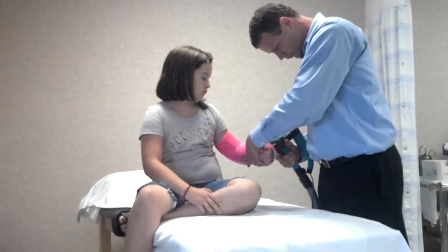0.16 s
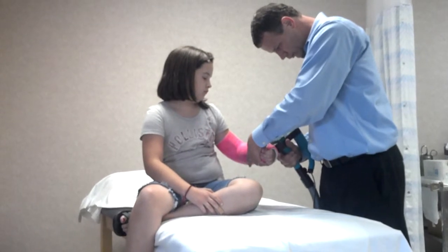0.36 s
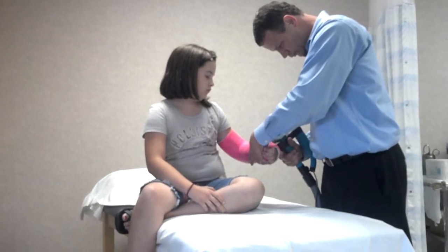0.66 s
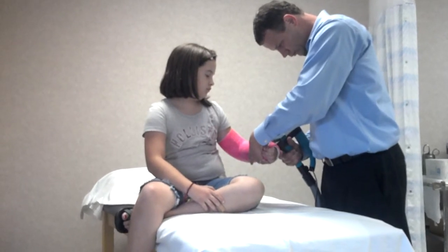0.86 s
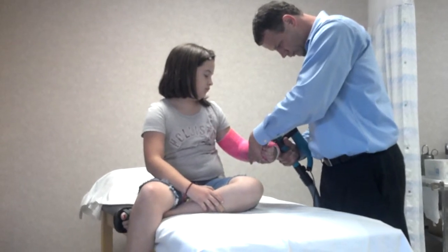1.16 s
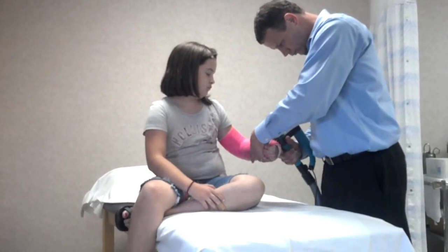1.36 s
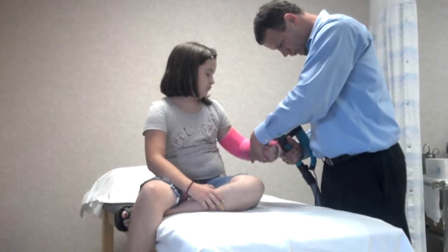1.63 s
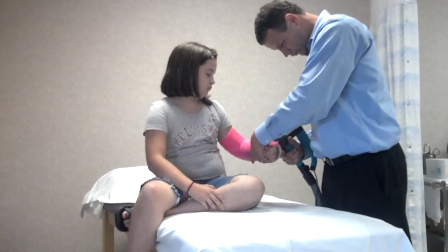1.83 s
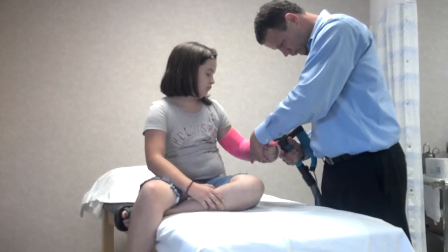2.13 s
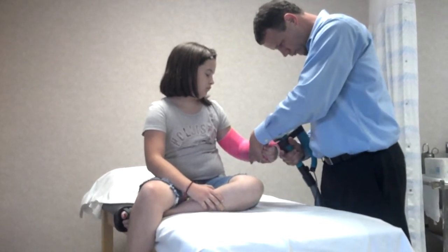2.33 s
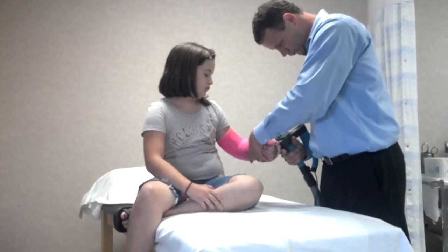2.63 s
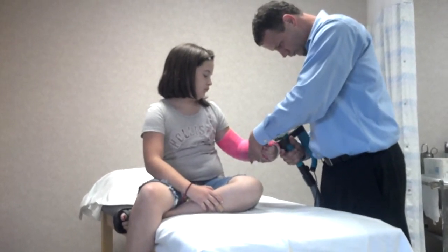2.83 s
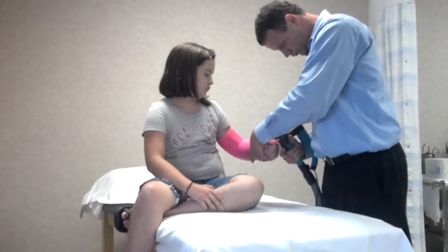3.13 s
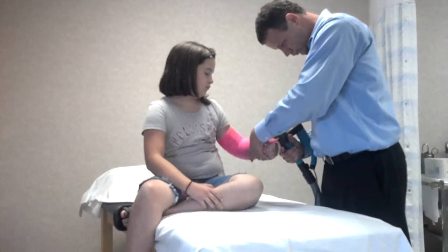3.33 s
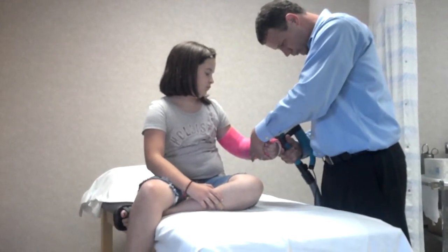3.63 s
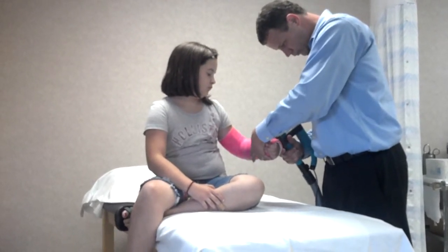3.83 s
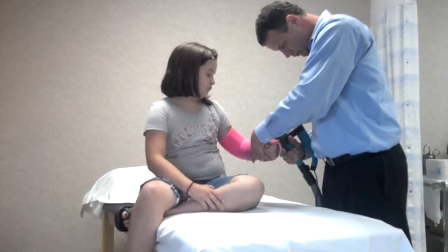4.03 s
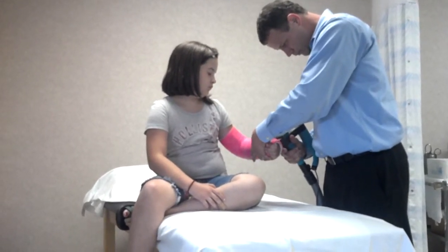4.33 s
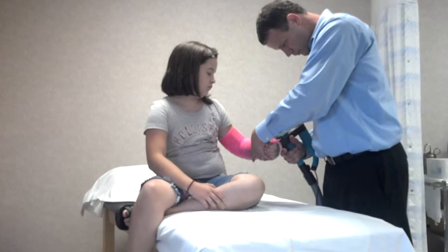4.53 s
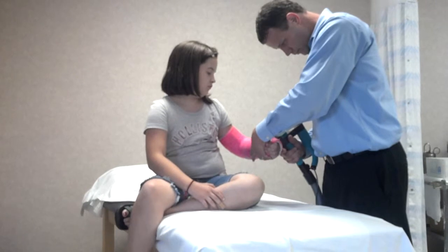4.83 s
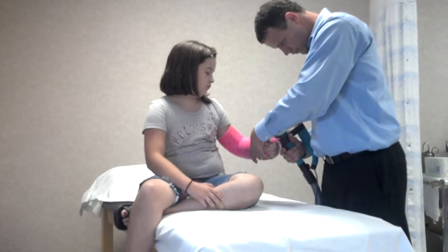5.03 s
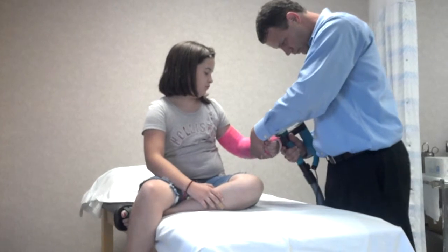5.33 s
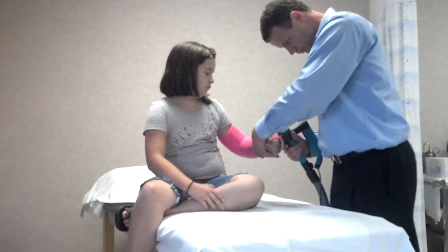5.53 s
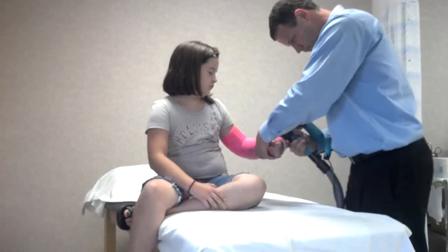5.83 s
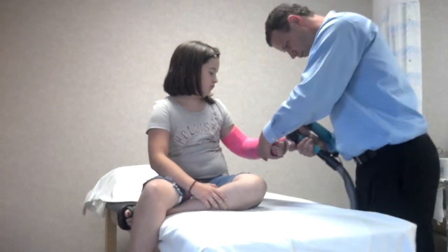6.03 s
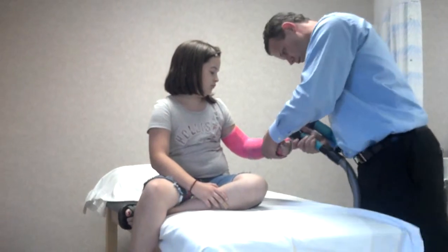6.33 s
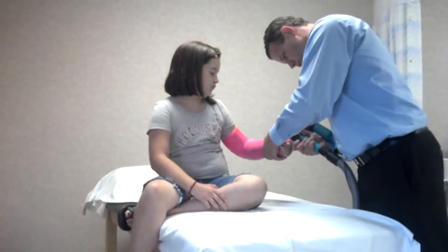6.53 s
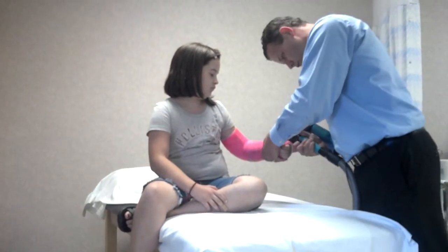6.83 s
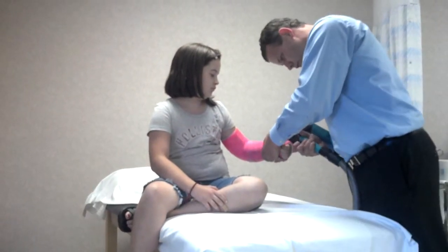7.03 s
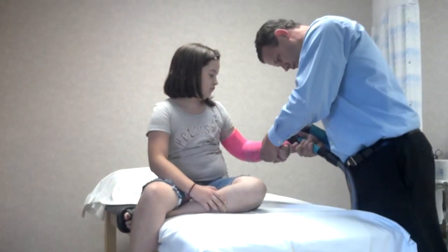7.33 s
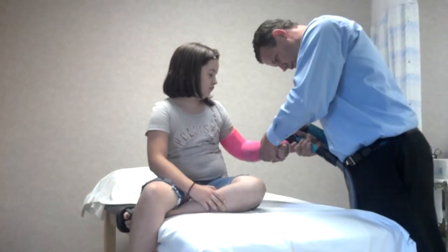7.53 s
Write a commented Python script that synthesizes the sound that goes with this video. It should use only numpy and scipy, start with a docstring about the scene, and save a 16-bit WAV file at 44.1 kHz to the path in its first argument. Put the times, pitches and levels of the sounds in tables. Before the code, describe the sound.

Raspy electric cast saw grinding a rigid shell, its buzz thickening and thinning with pressure, fan whir and rushing air behind, a few dull knocks.

```python
"""Oscillating cast saw with dust extractor

A saw cuts a hard arm cast in a small clinic room: each stroke raps the shell and scrapes grit from it as noise
bursts, setting cast and blade ringing. Pushes slow the motor and boost the cast; running freer, its gears buzz.
The extractor is a stack of fan overtones over filtered noise. Rings and noise bursts make knocks as the shell
gives; brief faint tones come late. A small microphone with a widened stereo image hears it all."""
import sys
import numpy as np
from scipy import signal
from scipy.fft import rfft, irfft, next_fast_len
from scipy.io import wavfile
from scipy.ndimage import uniform_filter1d

SR = 44100
rng = np.random.default_rng(int(sys.argv[2]) if len(sys.argv) > 2 else 0)


def generate_wav(sig):
    """Save sig (samples, or channels by samples) to the path in sys.argv[1] as 16-bit PCM at SR."""
    pcm = np.round(np.clip(np.atleast_2d(sig).T, -1, 1) * 32767).astype(np.int16)
    wavfile.write(sys.argv[1], SR, pcm)


N = 338247

# colour of the rushing air: f/Hz, level/dB per Hz
AIR_COLOUR = [(25, -94), (65, -79), (100, -76.5), (150, -71), (270, -68), (420, -73), (850, -72),
              (1050, -70), (2000, -76.5), (3300, -78.5), (6000, -88), (8000, -84), (12000, -92.5),
              (16000, -91.5)]


def undb(db):
    """Decibels to gain."""
    return 10 ** (np.asarray(db) / 20)


def curve(table):
    """A (time, value) table joined by straight lines."""
    s, value = np.transpose(table)
    return np.interp(np.arange(N) / SR, s, value)


def bins():
    """Frequencies of the padded spectrum that all frequency-response filters share."""
    return np.fft.rfftfreq(2 * next_fast_len(N // 2 + SR // 2), 1 / SR)


def filtered(x, response):
    """Apply a frequency response."""
    size = 2 * (len(response) - 1)
    return irfft(rfft(x, size) * response, size)[..., :N]


def contour(points):
    """(Hz, value) points joined on a log-frequency axis."""
    hz, value = np.transpose(points)
    return np.interp(np.log(bins() + 1), np.log(hz), value)


def resonances(modes):
    """Response of (Hz, half-power width, dB) modes with steep skirts; their powers add."""
    f = bins() + 1
    power = 0
    for hz, width, db in modes:
        detune = (f - hz * hz / f) / (1.55 * width)
        power = power + undb(2 * db) / (1 + detune ** 2) ** 2
    return np.sqrt(power)


def flat(x):
    """Scale a broadband drive to unit power per Hz."""
    return x * np.sqrt(SR / 2) / np.std(x)


def noise():
    """White noise of unit power per Hz."""
    return flat(rng.standard_normal(N))


def walk(rate):
    """Random levels held 1 / rate s and slewed twice; spread near 1."""
    k = max(int(SR / rate), 1)
    steps = np.repeat(rng.standard_normal(N // k + 1), k)
    return 1.3 * uniform_filter1d(uniform_filter1d(steps, k), k)[:N]


def decay(t, t60):
    """Exponential decay that falls 60 dB in t60 seconds."""
    return np.exp(-np.log(1000) * t / t60)


def swell(s, length):
    """A rounded rise and fall that starts at s."""
    part = np.clip((np.arange(N) / SR - s) / length, 0, 1)
    return np.sqrt(np.abs(np.sin(np.pi * part)))


def room(x, t60, wet_db, ripple=0.62):
    """Direct sound and a dense, short tail; ripple 0-1 is how much the reflections colour it."""
    t = np.arange(SR // 2) / SR
    tail = rng.standard_normal(len(t)) * decay(t, t60) * (t > .002)
    reflections = rfft(tail / np.linalg.norm(tail), 2 * len(bins()) - 2)
    wet = undb(wet_db)
    paths = (1 + wet * reflections) / np.hypot(1, wet)
    flattening = (np.abs(paths) + 0.0083) ** (ripple - 1)
    return filtered(x, paths * flattening)


def pushes():
    """Hz by which the motor sags as the hand leans on the saw and eases off."""
    # pushes: hardest/s, rise/s, release/s, motor sag/Hz
    leans = [(0.481, 0.36, 0.47, 3.68), (1.058, .1, 0.13, 4.32), (2.191, 0.068, .25, 3.13),
             (2.42, .22, .15, 4.9), (3.619, 0.37, 0.19, 4.88), (4.73, .32, .21, 4.06), (5.5, .25, .22, 2.6),
             (5.74, 0.16, 0.068, 3.97), (7.42, 0.36, 0.53, 3.8)]
    t = np.arange(N) / SR
    return sum(np.interp(t, [s - rise, s, s + release], [0, sag_hz, 0]) for s, rise, release, sag_hz in leans)


def bites():
    """Extra scraping and blade ring in dB as the teeth catch: each bite grips quickly, holds and lets go."""
    # spurts of torn grit: t/s, length after the attack/s, extra scraping before its limit/dB, extra ring/dB
    catches = [(0, 0.19, 6.5, 5), (0.838, 0.07, 7.5, 1), (1.012, 0.16, 8.5, 7), (2.146, 0.078, 6, 5),
               (2.357, 0.16, 8, -1), (3.147, 0.14, 6, 5), (3.565, 0.22, 9, 11), (4.651, .22, 4.5, -1),
               (4.981, 0.2, 4, 0), (5.65, 0.11, 8.5, 5), (6.607, 0.35, 6, 5), (7.351, 0.23, 2.5, 5.5)]
    attack_s, hold_share = 0.0052, 0.44  # the hold is a share of the bite's length
    t = np.arange(N) / SR
    total = np.zeros((2, N))
    for s, length, scrape_db, ring_db in catches:
        corners = [-attack_s, 0, hold_share * length, length]
        grip = np.interp(t - s - attack_s, corners, [0, 1, 1, 0])
        total += np.outer([scrape_db, ring_db], grip)
    return total


def cutting():
    """Levels in dB of rapping, scraping and blade ring: all grow with contact; bites add grit up to a limit."""
    # how firmly the blade lies on the cast: t/s, contact/dB
    firmness = [(0.0, -10.5), (0.6, -8.5), (1.1, -3), (1.2, -3.5), (1.3, -1), (1.55, -.5), (1.93, -2.5),
                (2.08, -8), (2.2, -3.5), (2.55, -7), (2.88, -17.5), (3.1, -24), (3.2, -13), (3.45, -8),
                (3.62, -3), (4.0, -4.5), (4.45, -1.5), (4.8, -1), (5.1, -8), (5.25, 0), (5.38, -2.5),
                (5.74, -1.5), (5.86, -12), (6.5, -10.5), (6.7, -10.5), (7.1, -10.5), (7.42, -6), (7.67, -6)]
    # level at 0 dB contact (dB) and growth (dB per dB of contact)
    rap_firm_db, rap_growth = 2, 1.25
    scrape_firm_db, scrape_growth = 0.5, 0.65
    ring_firm_db, ring_growth = -0.5, 1.31
    rap_loss_per_bite = 0.43  # dB per dB of bite: the even rapping falters
    full_bite_db = 6.5  # soft ceiling: the teeth can tear only so much on one swing
    contact_db = curve(firmness)
    bite_db, bite_ring_db = bites()
    rap_db = rap_firm_db + rap_growth * contact_db - rap_loss_per_bite * bite_db
    tear_db = scrape_firm_db + scrape_growth * contact_db + bite_db
    scrape_db = tear_db - 10 * np.log10(1 + undb(2 * (tear_db - full_bite_db)))
    ring_db = ring_firm_db + ring_growth * contact_db + bite_ring_db + walk(8.2)  # 1 dB waver
    return rap_db, scrape_db, ring_db


def raps(turns, hz, jitter, scatter_db):
    """One sharp tap per turn, each early or late by a share of a stroke and of its own force."""
    stroke = np.round(turns).astype(int)
    late, force = rng.standard_normal((N // 100, 2))[stroke].T
    samples = (turns - stroke - jitter * late) * SR / hz
    return np.sinc(samples) * np.exp(-(samples / 10) ** 2) * undb(scatter_db * force)


def tearing(turns, hz):
    """Fibres tear in bursts on each swing; retracing a groove repeats part of the rasp until a fresh bite."""
    groove_kept = .45  # share of the rasp that one stroke passes to the next
    groove_loss_per_bite = .6  # dB per dB of bite
    kept = np.clip(groove_kept * undb(-groove_loss_per_bite * bites()[0]), 0, .9)
    groove, now = noise(), np.arange(N)
    rasp = np.zeros(N)
    for k in range(5):
        earlier = np.round(now - k * SR / hz).astype(int)
        rasp += kept ** k * groove[earlier]
    rasp *= np.sqrt(1 - kept ** 2)  # hold the level as more is kept
    swing = 2 * np.pi * turns
    burst_db = 5.5 * np.cos(swing) + 4.3 * np.cos(2 * swing)  # loudest at the forward rap
    return flat(rasp * undb(burst_db + 1.6 * walk(150)))


def rattle(hz):
    """Level of the gear buzz in dB: gears rattle when the motor runs free; load takes up their play."""
    free_hz, free_db, loaded_db, hush_db_per_hz = 179.08, 0.1, -12, 5
    db = free_db - hush_db_per_hz * np.maximum(free_hz - hz, 0)
    return np.maximum(db, loaded_db) + walk(18)  # the play comes and goes by about 1 dB


def slot(grit):
    """The blade sinks into a fresh place; scraping rings a resonance of the cut that climbs and settles."""
    # singing slots: t/s, length/s, level/dB
    cuts = [(0, 1.05, -48), (2.449, 0.41, -51), (6.6, 0.89, -41)]
    shallow_hz, deep_hz, sink_s = 3710, 4230, 0.28
    t, out = np.arange(N) / SR, np.zeros(N)
    lowpass = signal.butter(2, 160, fs=SR, output="sos")  # half the resonance's width, in Hz
    for s, length, db in cuts:
        hz = deep_hz + (shallow_hz - deep_hz) * np.exp(-np.maximum(t - s, 0) / sink_s)
        carrier = np.exp(2j * np.pi * np.cumsum(hz) / SR)
        narrow = signal.sosfilt(lowpass, grit / carrier)  # grit around the moving pitch
        sing = (narrow * carrier).real
        out += sing / np.std(sing) * undb(db) * swell(s, length)
    return out


def shifting(x):
    """Hands and blade keep moving, so the overtones trade strength while their sum holds."""
    near, far = 0.47 * walk(8), 0.43 * walk(17)
    echoes = near * room(x, t60=0.041, wet_db=34) + far * room(x, t60=0.12, wet_db=34)
    return (x + echoes) / np.sqrt(1 + near ** 2 + far ** 2)


def singing(swing):
    """A loosened flap of the cast locks on to an overtone of the stroke and wavers."""
    # spells of singing: t/s, length/s, multiple of the stroke rate, level before waver/dB RMS
    spells = [(0.247, 0.65, 7, -44.5), (1.35, 0.73, 11, -38.5), (1.269, 0.57, 20, -41),
              (2.22, 0.16, 13, -37), (3.385, 0.26, 7, -39.5), (3.85, .8, 11, -41), (4.0, 0.75, 14, -43),
              (4.3, 0.49, 13, -40), (5.22, 0.55, 14, -35), (5.2, 0.48, 11, -39), (5.302, .35, 13, -37),
              (5.33, .28, 15, -32), (5.321, 0.32, 16, -33), (5.63, 0.13, 9, -36), (5.631, 0.17, 21, -34),
              (5.854, 0.895, 7, -45.5), (6.08, .22, 18, -39), (6.2, .3, 20, -44), (5.9, 1.0, 13, -43.5),
              (6.291, .36, 19, -44.5), (6.784, 0.2, 9, -34), (7.08, 0.76, 10, -35.5),
              (7.278, 0.24, 12, -37), (7.331, 0.19, 13, -41)]
    waver_db, waver_rad = 3, .8
    out = np.zeros(N)
    for s, length, k, db in spells:
        level = undb(db + waver_db * walk(30)) * swell(s, length)
        out += level * np.sin(k * swing + waver_rad * walk(45))
    return np.sqrt(2) * out


def saw():
    """The blade raps the cast on each swing and back, scraping most at the forward rap; shell and steel ring."""
    # motor speed before the pushes slow it: t/s, stroke rate/Hz
    motor_speed = [(0, 176.2), (.55, 175.5), (.9, 175.7), (1.33, 172), (1.55, 174.8), (1.9, 173.6),
                   (2.05, 176.7), (2.6, 176), (3.25, 177.7), (3.7, 175.2), (4.4, 173.8), (5.02, 177),
                   (5.3, 175.4), (5.45, 175.5), (5.74, 173.3), (5.87, 178.9), (6.88, 178.7), (6.99, 174.5),
                   (7.67, 173.8)]
    # colours of the blows, the scraping and the gears: f/Hz, response/dB
    rap_colour = [(150, -94), (500, -69), (1000, -73), (1400, -69.5), (1900, -68.5), (2400, -81),
                  (2750, -78), (3100, -66.5), (3500, -66.5), (4600, -69), (5700, -72.5), (6900, -73),
                  (8000, -76.5), (11000, -86.5), (16000, -99)]
    scrape_colour = [(300, -92), (1200, -73.5), (2000, -68.5), (2800, -67.5), (3700, -67), (4600, -67),
                     (5700, -68.5), (7000, -73.5), (8000, -78.5), (10500, -81.5), (13000, -104),
                     (14200, -81.5), (16000, -102)]
    gear_colour = [(170, -76), (900, -69), (1250, -67), (1600, -72), (2300, -70), (2700, -79),
                   (3330, -63.5), (3700, -80.5), (4200, -86), (5200, -76), (6500, -77), (8000, -104),
                   (14000, -90), (16000, -99)]
    # modes of the hollow cast, then of the steel blade: f/Hz, width/Hz, response/dB
    shell_modes = [(1740, 30, -62.5), (1928, 59, -63.5), (2024, 105, -60.5), (2120, 110, -66),
                   (2427, 126, -59), (3700, 290, -83), (3950, 110, -81)]
    blade_modes = [(5095, 83, -56), (5110, 94, -54.5), (5220, 140, -60), (12260, 180, -79.5),
                   (13800, 600, -90)]
    shell_db, shell_db_per_hz = -3.5, 2  # the cast booms more as a push sags the motor
    hand_waver_db = .7

    sag_hz = pushes()
    hz = (curve(motor_speed) - sag_hz) * (1 + .0009 * walk(35))
    turns = 1 + np.cumsum(hz) / SR
    rap_db, scrape_db, ring_db = cutting()
    # a seated blade strikes very evenly; the return blow is weaker and looser
    forward = raps(turns, hz, jitter=.0011, scatter_db=1.1)
    back = raps(turns + .47, hz, jitter=0.002, scatter_db=3)
    grit = tearing(turns, hz)
    rapping = flat(forward + 0.39 * back) * undb(rap_db + hand_waver_db * walk(14))
    scraping = grit * undb(scrape_db + hand_waver_db * walk(22.02))
    contact = filtered(rapping, undb(contour(rap_colour))) + filtered(scraping, undb(contour(scrape_colour)))
    boom = undb(shell_db + shell_db_per_hz * sag_hz)
    shell = filtered((rapping + .3 * scraping) * boom, resonances(shell_modes))
    # even out the drive so that ring_db mainly sets the blade's level
    drive = (rapping + .45 * scraping) / np.hypot(undb(rap_db), 0.39 * undb(scrape_db))
    blade = filtered(drive * undb(ring_db), resonances(blade_modes))
    gear_taps = flat(raps(turns + 0.2385, hz, jitter=0.00055, scatter_db=0.0))
    gear = filtered(gear_taps * undb(rattle(hz)), undb(contour(gear_colour)))
    sound = contact + shell + blade + slot(grit) + gear
    return room(shifting(sound), t60=.22, wet_db=2, ripple=0.18) + singing(2 * np.pi * turns)


def extractor():
    """Fan blades sound a steady note; the air they draw rushes through canister and hose."""
    # overtones of the fan: multiple, level/dB
    fan_orders = [(1, -0.5), (2, -23), (3, -19.5), (4, -26.5), (12, -28.5), (22, -54)]
    # fan hum, before a 6 dB lift: t/s, level/dB
    hum_level = [(0, -30), (0.45, -28.5), (0.87, -26), (1.5, -30), (2.17, -28.5), (2.4, -35.5), (2.9, -34),
                 (3.55, -27), (3.66, -32), (4.1, -29), (4.6, -32), (5.3, -29.5), (5.78, -33), (6.1, -30.5),
                 (6.35, -30.5), (7.2, -26.5), (7.67, -28.5)]
    # rushing air, used as a scaled swing about its mean: t/s, level/dB
    air_level = [(0, -36.5), (0.9, -33), (1.3, -36), (2.5, -35.5), (2.85, -36), (3.5, -31), (3.72, -39),
                 (5.4, -35), (5.85, -38.5), (7.15, -30.5), (7.67, -32)]
    # resonances of canister and hose: f/Hz, width/Hz, level/dB per Hz
    canister = [(121.5, 20, -67), (178.8, 19.3, -54.5), (219.7, 15.6, -58), (335.2, 34.5, -56),
                (478.4, 11.6, -59.5), (535, 17, -62.5), (645, 63, -63), (707, 71, -57), (770, 19, -61),
                (824, 19.5, -59.5), (908, 19, -58)]
    fan_hz = 382.66
    angle = 2 * np.pi * np.cumsum(fan_hz * (1 + 0.000684 * walk(4.08))) / SR
    hum = np.zeros(N)
    for k, db in fan_orders:
        shake_db = .4 if k == 1 else 2.5  # turbulence shakes the overtones more than the fundamental
        hum += undb(db + shake_db * walk(28)) * np.sin(k * angle)
    air = filtered(noise(), np.hypot(undb(contour(AIR_COLOUR)), resonances(canister)))
    air_db = curve(air_level)
    rush_db = 0.67 * (air_db - np.mean(air_db)) + 0.88 * walk(9)
    return hum * undb(curve(hum_level) + 6.0), air * undb(rush_db)


def ring(modes, t):
    """Decaying sines of (Hz, dB, t60) modes, all struck at once."""
    return sum(undb(db) * decay(t, t60) * np.sin(2 * np.pi * hz * t) for hz, db, t60 in modes)


def burst(band_hz, t60, t):
    """A decaying burst of band-passed noise."""
    bandpass = signal.butter(2, band_hz, "bandpass", fs=SR, output="sos")
    return signal.sosfilt(bandpass, rng.standard_normal(len(t)) * decay(t, t60))


def knocks():
    """The shell gives way: a short crack and a low crunch, and the blow rings on in cast and support."""
    # knocks: t/s, level/dB, share of low thud/dB
    blows = [(2.182, -23.5, 1), (2.189, -36, -3), (2.197, -29.5, -0.5), (2.836, -28, -25),
             (2.846, -32, -25)]
    # what rings, high in the shell and low in arm and couch: f/Hz, level/dB, t60/s
    clack_modes = [(830, -7, 0.22), (943, -2, 0.14), (1050, 2, 0.092), (1154, -4, .13), (1280, -10, .13),
                   (1420, -11, .11), (1640, -11, .07)]
    thud_modes = [(135, -9.5, 0.23), (171, -3, .33), (232, -1, 0.3), (318, -3.5, .25), (447, -3, .14),
                  (530, -8, .12)]
    t, out = np.arange(SR // 2) / SR, np.zeros(N)
    for s, db, thud_db in blows:
        crack = undb(11) * burst((750, 2200), .07, t)
        crunch = undb(13.5) * burst((120, 830), 0.33, t)
        high = ring(clack_modes, t) + crack
        low = ring(thud_modes, t) + crunch
        start = int(s * SR)
        out[start:start + len(t)] += undb(db) * (high + undb(thud_db) * low)
    # the cast is too small to radiate below 115 Hz
    highpass = signal.butter(4, 115, "highpass", fs=SR, output="sos")
    return room(signal.sosfilt(highpass, out), t60=0.2, wet_db=-8, ripple=0.42)


def tones():
    """Brief, faint sine tones under the din that glide and waver in pitch as they swell and sag."""
    # tones: t/s, length/s, start f/Hz, end f/Hz, level before the swell/dB RMS
    glides = [(6.492, 0.17, 437.4, 430, -40), (6.637, 0.14, 449, 421.3, -35.5), (7.47, .18, 554, 550, -35)]
    t, out = np.arange(N) / SR, np.zeros(N)
    for s, length, start_hz, end_hz, db in glides:
        part = np.clip((t - s) / length, 0, 1)
        hz = (start_hz + (end_hz - start_hz) * part) * (1 + 0.0047 * walk(50))
        level = undb(db) * np.sqrt(2) * np.sin(np.pi * part)
        out += level * np.sin(2 * np.pi * np.cumsum(hz) / SR)
    return out


def scene():
    """All reaches one spot; each side adds its own wall sound and air, and the hum wanders between them."""
    # the hum wanders as bodies move in its standing wave: t/s, left minus right before the widener/dB
    hum_pan = [(0, 0), (1.5, -3.5), (1.8, -1), (2.38, 2.5), (2.82, -4), (3.2, -1.5), (3.9, -0.5),
               (4.4, 2.5), (5.05, 0), (6, 2.5), (6.65, 2.5), (7.67, 1)]
    pan_db = -2.5  # left minus right for everything else, before the widener
    hum, air = extractor()
    sound = saw() + air + knocks() + tones()
    treble = filtered(sound, np.clip(bins() / 1200, 0, 1) ** 3)  # only the treble differs by wall sound
    stray_air = undb(contour(AIR_COLOUR) - 16.0)
    sides = []
    for _ in range(2):
        walls = room(treble, t60=0.059, wet_db=-13.0, ripple=0.052)
        sides.append(sound - treble + walls + filtered(noise(), stray_air))
    left_right = np.array([[1], [-1]]) / 2
    return np.array(sides) * undb(left_right * pan_db) + hum * undb(left_right * curve(hum_pan))


def record(dry):
    """The widener tilts the sides, inverts the right and makes it slightly late; the top is cut."""
    # level balance of the image: f/Hz, left minus right/dB
    balance = [(60, 3), (180, 5), (335, 5.5), (380, -2.5), (450, -5), (750, 2.5), (1300, -1), (2500, 0.5),
               (5000, -1), (8000, 1.5), (14000, 2)]
    # phase turn of the right side, mostly in the bass: f/Hz, lag/radians
    phase_turn = [(50, -0.39), (170, 0.79), (383, 0.65), (700, 0.82), (1300, -0.065), (2000, 0.092),
                  (2450, -0.29), (2800, 0.031)]
    lag_samples, top_hz = 16, 15800
    tilt = undb(contour(balance) / 2)
    lag = 2 * np.pi * bins() * lag_samples / SR + contour(phase_turn)
    left = filtered(dry[0], tilt)
    right = filtered(dry[1], -np.exp(-1j * lag) / tilt)
    top_cut = signal.ellip(10, .1, 80, top_hz, fs=SR, output="sos")
    return signal.sosfilt(top_cut, np.array([left, right]))


dry = scene()
out = record(dry)
generate_wav(out)
```